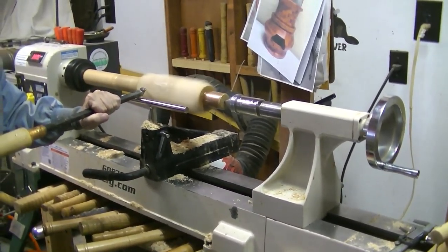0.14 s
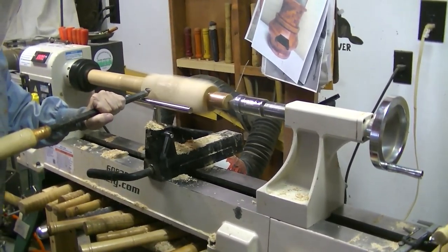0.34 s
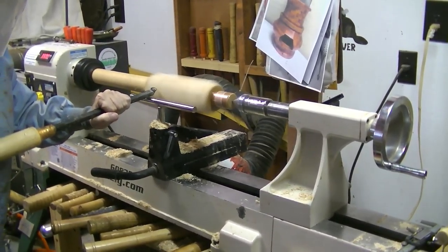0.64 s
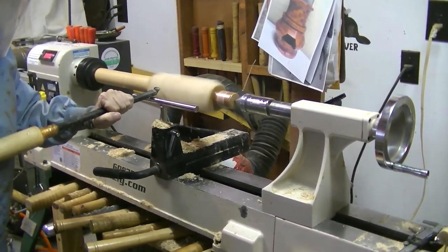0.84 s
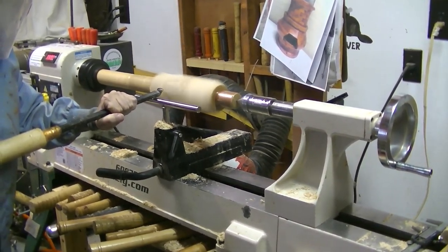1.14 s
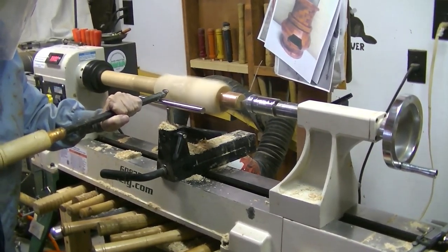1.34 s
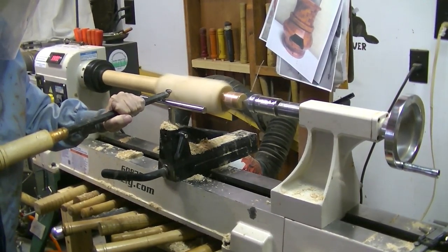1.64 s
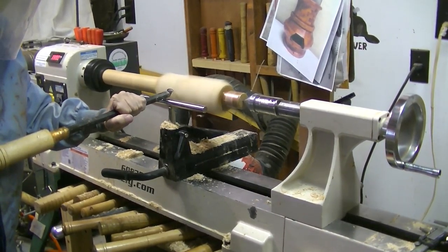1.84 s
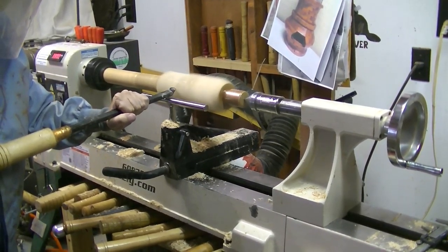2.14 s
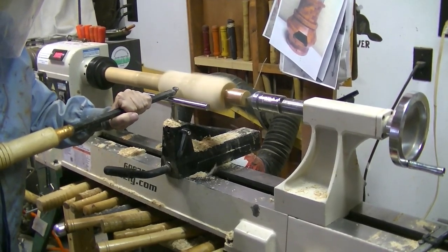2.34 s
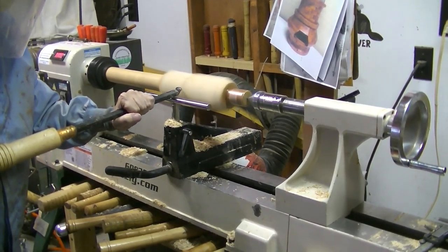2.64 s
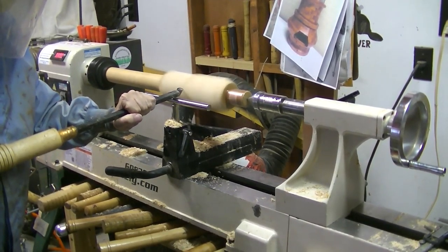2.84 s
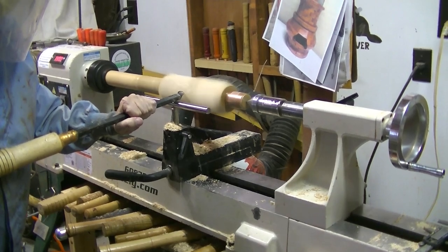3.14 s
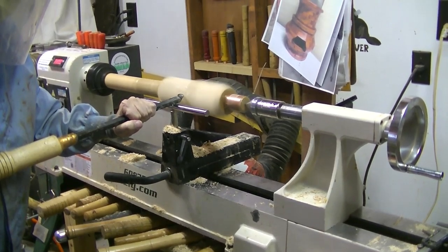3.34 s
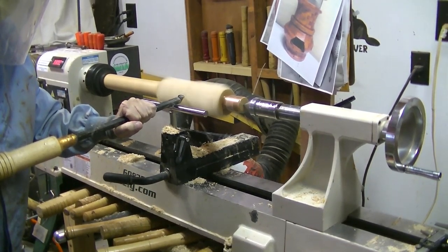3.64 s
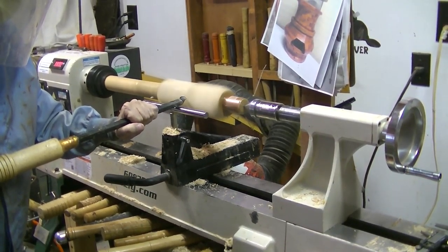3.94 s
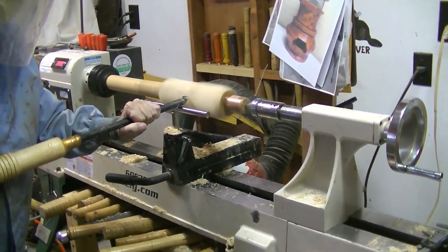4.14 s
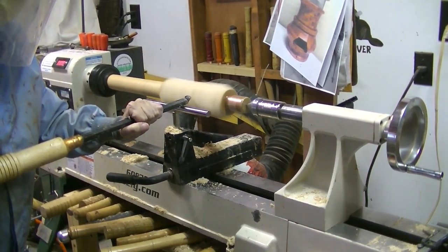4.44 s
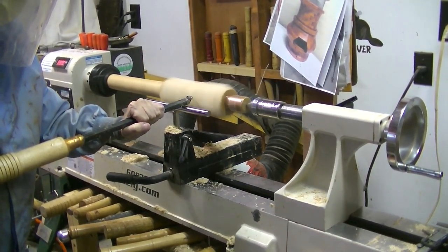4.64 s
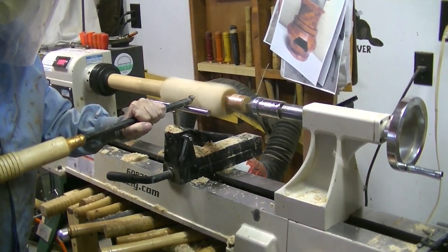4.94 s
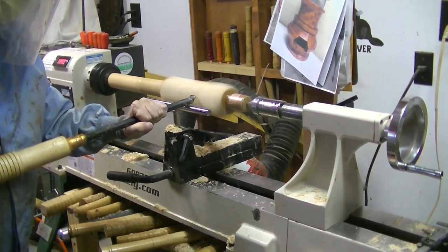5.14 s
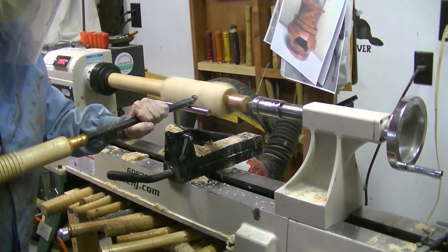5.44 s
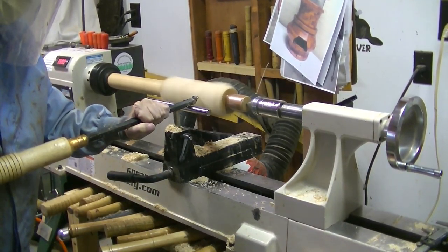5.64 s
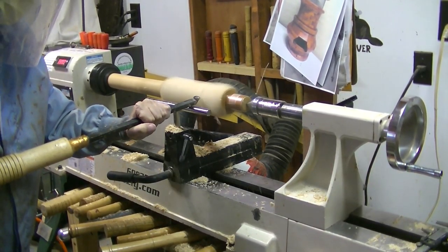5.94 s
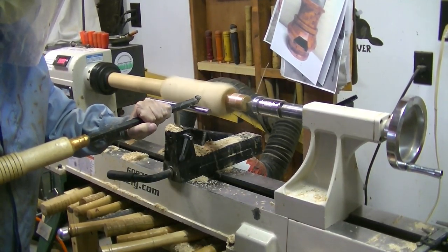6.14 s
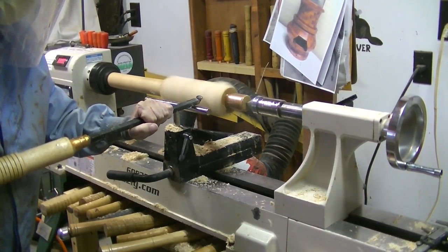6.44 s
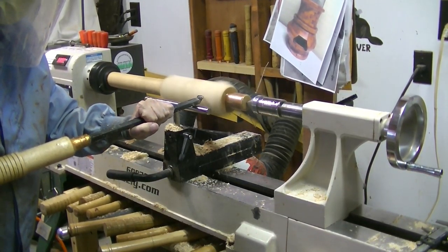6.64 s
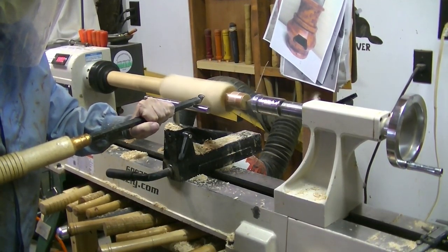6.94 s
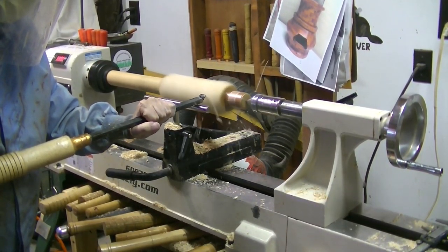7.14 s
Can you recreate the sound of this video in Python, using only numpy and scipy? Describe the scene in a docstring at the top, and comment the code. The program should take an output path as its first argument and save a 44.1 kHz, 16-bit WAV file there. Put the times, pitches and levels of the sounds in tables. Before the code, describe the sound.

A hand-held gouge scrapes and chatters along wood spinning on a lathe, with rapid ticking, sharp catches and hissing chips.

```python
"""A hand-held gouge travels along a not yet round wooden blank spinning on a lathe in a small workshop. Eight
ridges a turn tick on the edge, some catch hard, fibres tear in between; blank, gouge and rest ring. Chips hiss,
snap and ping on metal; the loudest catches give faint low thumps. Spindle and motor hum, the drive whines. A
sideways microphone pair faces the work with its right port."""
import sys
import numpy as np
from scipy import signal
from scipy.fft import rfft, irfft, next_fast_len
from scipy.io import wavfile
from scipy.ndimage import uniform_filter1d

SR = 44100
rng = np.random.default_rng(int(sys.argv[2]) if len(sys.argv) > 2 else 0)


def store_wav(level_fs):
    """Save 16-bit WAV to argv[1]."""
    pcm = np.round(np.clip(np.atleast_2d(level_fs), -1, 1) * 32767)
    wavfile.write(sys.argv[1], SR, pcm.T.astype(np.int16))


N = 320852

# hard catches of the edge: (time [s], bite [dB], wood thud [dB], chip snap [dB])
CATCHES = [(0.161, -18, -27, -35), (0.302, -6, -20, -33), (0.36, -5.5, -28, -28), (0.411, -6, -17, -27),
           (0.461, -9.5, -19, -38), (0.5102, -18, -13, -36), (0.6, -23, -35, -33), (0.6604, -9, -35, -33),
           (0.7, -15, -32, -30), (0.78, -12, -26, -33), (0.941, -1, -15, -36), (1.002, -2, -15, -34),
           (1.049, -0.5, -9, -21), (1.209, -6, -40, -10), (1.3613, -7, -19, -29), (1.498, -14, -37, -24),
           (1.54, -12, -22, -28), (1.699, -9, -10, -8), (1.7783, -6.5, -28, -17), (1.84, -10, -2, -33),
           (1.978, -7, -16, -11), (2.0187, -2.5, -25, -29), (2.059, -11, -38, -34), (2.0986, -16, -39, -34),
           (2.1776, -9, -28, -30), (2.218, -4.5, -13, -32), (2.342, -4.5, -5, -19), (2.458, -25, -11, -4.5),
           (2.592, -4.5, -3, -18), (2.6498, -11, -30, -32), (2.833, -13, -35, -12), (2.8802, -4, -21, -7),
           (2.9566, -14, -9, -9), (3.05, -10, -30, -28), (3.098, -9, -22, -28), (3.137, -7, -19, -30),
           (3.208, -2, -25, -32), (3.2864, -14, -32, -28), (3.4007, -5, -17, -11), (3.4483, -4.5, -17, -15),
           (3.5605, -7, -7, -19), (3.6162, -7, -24, -13), (3.777, -4, -31, -35), (3.8167, -4, -4, -39),
           (3.932, -6, -44, -28.5), (3.973, -8.5, -59, -24), (4.014, -3, -36, -11), (4.062, -3.5, -13, -29),
           (4.097, -7, -35, -26), (4.133, -3.5, -32, -11), (4.1724, -8, -40, -18), (4.258, -4.5, -12, -9),
           (4.2953, -6, -21, -17), (4.333, -17, -14, -1), (4.412, 0, -41, -14), (4.595, -18, -8, -29),
           (4.6356, -11, -9, -11), (4.7431, -22, -42, -31), (4.886, -9, -25, -30), (5.0076, -4, -14, -31),
           (5.056, -8, -6, -9), (5.147, -10, -33, -27), (5.199, -3, -33, -31), (5.3086, -4, -32, -14),
           (5.332, -6, -27, -31), (5.379, -7, -20, -33), (5.438, -3, -26, -29), (5.618, -7, -12, -36),
           (5.655, -19, -28, -40), (5.6987, -9, -5, -31), (5.8223, -4, -27, -7), (5.896, -0.5, -33, -10),
           (5.969, -17, -26, -33), (6.055, -4.5, -6, -27), (6.135, -9, -15, -9), (6.177, -0.5, -15, -23),
           (6.24, -1, -11, -30), (6.4553, -4.5, -13, -11), (6.6915, 0.5, -13, -19), (6.737, 0, -27, -28),
           (6.783, -4.5, -24, -20), (6.799, -3.5, -26, -14), (6.848, 2, -16, -15), (6.896, 1.5, -17, -6),
           (7.007, -6, -17, -33), (7.057, -3, -27, -31), (7.171, -7, -24, -32), (7.217, -10, -19, -33),
           (7.257, -17, -24, -33)]
# ring levels as the gouge travels: (time [s], blank [dB], gouge [dB], shank [dB], tip whistle [dB])
TRAVEL = [(0.0, -23.5, -26.5, -26, -39), (0.1, -28.5, -43, -38, -44), (0.36, -29, -31, -32, -36),
          (0.45, -26.5, -41, -32, -43), (0.61, -40, -28, -31, -30.5), (0.75, -28.5, -33, -29.5, -31),
          (0.83, -30, -31, -31, -46), (1.05, -31, -32, -31, -34), (1.13, -36, -31, -38, -39),
          (1.6, -36, -29, -31, -31.5), (1.76, -45, -33, -37, -43), (1.98, -44, -28, -32, -31),
          (2.78, -47, -31.5, -28.5, -43), (3.54, -38.5, -32, -27, -45), (3.95, -46, -28.5, -30.5, -34.5),
          (4.52, -42.5, -28.5, -35.5, -40), (5.37, -30, -26.5, -36, -41), (5.65, -28.5, -30.5, -38, -45),
          (5.69, -21, -25.5, -47, -40), (5.81, -32.5, -32, -32, -34), (6.1, -26, -31.5, -40, -46),
          (6.24, -28.5, -31, -40, -35), (6.34, -26, -38, -32, -42), (6.89, -28, -28, -39, -37),
          (6.97, -42, -33, -37, -45), (7.01, -29, -32, -29, -36), (7.21, -27, -43, -44, -45),
          (7.28, -29, -40, -40, -36)]


def cutting():
    """Tearing, ticks and catches excite wood and steel; rows: radiated to the right, to the left."""
    # edge pressure, as tearing: (time [s], level [dB])
    pressure = [(0.0, -24.5), (0.16, -22), (0.55, -25), (0.81, -23), (1.13, -24.5), (1.5, -20.5),
                (1.82, -24), (2.21, -22), (2.47, -22.5), (2.61, -27), (3.04, -21.5), (3.22, -21.5),
                (4.09, -22), (4.48, -23), (5.17, -22), (5.35, -24), (5.57, -23.5), (5.75, -21.5),
                (6.06, -22), (6.24, -22.5), (6.48, -22), (6.67, -21.5), (6.89, -22.5), (7.03, -25.5),
                (7.28, -24)]
    lift_db = lifts()
    tear_db = in_time(pressure)[0] + lift_db
    ticks = ridges(lift_db)
    noise = rng.standard_normal((4, 2, N))
    force = amp(tear_db + 0.5) * fibres(per_s=7000, uneven_db=4) + (ticks + catches()) * noise[0]
    power = force[0] ** 2
    strength = np.sqrt(uniform_filter1d(power, 12))
    grain = noise[1] * strength / np.sqrt(uniform_filter1d(power, SR // 4))  # texture without level
    rings = blank(grain, tear_db, noise[2]) + steel(grain, tear_db) + lathe_body(strength * noise[2])
    return scrape(force) + rings + chips(tear_db, ticks, noise[3]) + pings()


def fibres(per_s, uneven_db):
    """Fibres tear at random, in uneven sizes and clumps; two rows, rms 1."""
    sizes = amp(uneven_db * np.minimum(rng.exponential(1, N), 3.2)) * rng.choice([-1, 1], (2, N))
    tears = rng.random(N) < per_s / SR
    return rms_one(sizes * tears * amp(1.2 * drift(41)))


def ridges(lift_db):
    """Envelope, one tick per ridge; the blank's four old corners stand prouder than the flats."""
    # ridge height under the edge, as ticks: (time [s], level [dB])
    height = [(0, -33.5), (1.1, -33.5), (2.1, -32), (2.6, -29.5), (3.9, -35), (4.6, -39), (5.8, -31.5),
              (7.28, -36.5)]
    ridges_per_s, first_s = 200.19, 0.0009
    k = np.arange(int(N / SR * ridges_per_s))
    scatter_db = 3.6 * np.clip(rng.standard_normal(len(k)), -3, 1.5)
    proud_db = 3.4 * (k % 2 == 0) + 7.2 * (k % 8 == 4) + scatter_db
    ticks = bursts(first_s + k / ridges_per_s, proud_db + 6, t60_s=0.011)
    return amp(in_time(height)[0] + lift_db) * ticks


def catches():
    """Envelope of the edge catching: a sharp bite, then chatter."""
    s, bite_db, _, _ = np.transpose(CATCHES)
    return bursts(s, bite_db - 23, t60_s=0.0036) + bursts(s, bite_db - 13, t60_s=0.077)


def lifts():
    """The edge lets up briefly; dips in dB."""
    # (time [s], dip [dB])
    dips = [(0.127, -3.5), (0.497, -5), (0.557, -3.5), (1.181, -2.5), (1.815, -2.5), (2.004, -4),
            (2.42, -5.5), (2.5, -5.5), (3.256, -3), (3.35, -6), (4.386, -4.5), (4.82, -3), (5.109, -6),
            (5.42, -5.5), (5.944, -3.5), (6.363, -4), (6.441, -4), (6.605, -3.5), (7.156, -4.5),
            (7.204, -3.5)]
    half_width_s = 0.021
    t = np.arange(N) / SR
    return sum(db * np.exp(-((t - s) / half_width_s) ** 2) for s, db in dips)


def scrape(force):
    """Broad noise of the cut in five bands, each with its own swell and rasp."""
    # tearing spectrum: (frequency [Hz], level [dB])
    spectrum = [(150, -52.5), (300, -15), (480, -17.5), (700, -15), (1050, -6), (1400, -1.5), (2500, 2.5),
                (3500, 1), (4300, -5), (5500, -5.5), (6600, -33.5), (7200, -14), (11000, -28.5),
                (16000, -65)]
    # trends of bands 2 and 4: (time [s], low [dB], middle [dB])
    colour = [(0.0, -28, -27), (0.34, -30, -26), (3.08, -31, -27), (3.16, -25, -23), (3.34, -35, -30),
              (3.44, -28, -27), (4.72, -32, -24), (6.26, -29, -26), (6.32, -33, -30), (6.77, -27, -24),
              (7.28, -32, -32)]
    edges_hz, swell_db = (990, 1630, 2480, 4100), 1.5
    tearing = coloured(force, spectrum)
    below = [0] + [band(tearing, "low", hz) for hz in edges_hz] + [tearing]
    low_db, middle_db = (db - db.mean() for db in in_time(colour))
    trends_db = 0, low_db, 0, middle_db, 0
    return amp(8) * sum((upper - lower) * amp(db + swell_db * (drift(7.7) + drift(35)))
                        for lower, upper, db in zip(below, below[1:], trends_db))


def blank(grain, tear_db, noise):
    """The wood thuds under the cut, rings broadly and sings on a narrow gliding resonance."""
    # (frequency [Hz], width [Hz], level [dB])
    modes = [(940, 80, -4)]
    # (time [s], frequency [Hz])
    pitch = [(0, 955), (.45, 975), (1.7, 985), (4.9, 980), (6.0, 980), (6.3, 955), (7.28, 925)]
    level_db = in_time(TRAVEL)[0]
    s, _, thud_db, _ = np.transpose(CATCHES)
    thuds = (amp(tear_db - 7) + bursts(s, thud_db - 10, t60_s=0.29)) * noise
    ring = resonate(amp(level_db + 6) * grain, modes)
    singing = sing(amp(level_db + 2.5) * grain, in_time(pitch)[0], width_hz=15)
    return amp(7.5) * band(thuds, "band", [520, 1050]) + ring + singing


def steel(grain, tear_db):
    """Gouge and tool rest ring, swelling and fading with the travel; the overhanging tip whistles."""
    # resonances: (frequency [Hz], width [Hz], level [dB])
    rest = [(1995, 135, 8)]
    tang = [(2563, 77, 3)]
    edge = [(5064, 180, 3.3)]
    shank = [(4045, 55, 3), (3885, 100, 3)]
    tip = [(1710, 150, 8), (6478, 160, 5)]
    # (time [s], rest [dB], tang [dB], edge [dB])
    levels = [(0, -32.5, -31, -39), (.5, -35.5, -24, -40), (1.0, -32.5, -32, -33.5), (1.7, -33.5, -39, -36),
              (2.4, -36.5, -54, -34.5), (3.3, -32.5, -50, -38), (3.9, -28.5, -29.5, -32),
              (4.4, -28.5, -29, -30), (4.7, -35, -26, -39), (5.1, -32.5, -30, -28.5),
              (5.5, -33.5, -32, -39.5), (5.9, -29.5, -44, -33), (6.4, -31.5, -50, -32),
              (6.8, -32, -26, -36), (7.28, -35, -57, -31)]
    # (time [s], frequency [Hz])
    whistle_pitch = [(0, 4570), (.5, 4585), (1.65, 4575), (1.9, 4515), (2.7, 4380), (3.1, 4300),
                     (3.6, 4370), (4.2, 4480), (4.9, 4560), (5.9, 4600), (7.28, 4510)]
    # two gliding gouge rings: (time [s], lower [Hz], upper [Hz])
    gouge_pitch = [(0, 3065, 3180), (1.7, 3060, 3200), (2.0, 3050, 3235), (3.2, 3060, 3240),
                   (3.7, 3055, 3170), (6.2, 3065, 3165), (6.7, 3000, 3165), (7.28, 2990, 3165)]
    # upper ring re lower: (time [s], level [dB])
    balance = [(0, 6), (1.7, -10), (2.0, -3), (2.4, -10), (3.1, -3), (3.6, -6), (4.4, -3.5), (5.4, -1.5),
               (6.2, -2.5), (6.7, -5), (7.28, -9)]
    _, gouge_db, shank_db, whistle_db = in_time(TRAVEL)
    rest_db, tang_db, edge_db = in_time(levels)
    parts = [(rest_db, rest), (tang_db, tang), (edge_db, edge), (shank_db, shank), (tear_db - 14.5, tip)]
    rings = sum(resonate(amp(db - 1) * grain, modes) for db, modes in parts)
    tip_drive = amp(whistle_db + 3 + 0.6 * drift(8.3)) * grain
    whistle = sing(tip_drive, in_time(whistle_pitch)[0], width_hz=28)
    lower_hz, upper_hz = in_time(gouge_pitch)
    gouge_drive = amp(gouge_db + 4.5) * grain
    lower = sing(gouge_drive, lower_hz, width_hz=80)
    upper = sing(amp(in_time(balance)[0]) * gouge_drive, upper_hz, width_hz=34)
    return rings + whistle + lower - upper


def lathe_body(drive):
    """The lathe body resonates with the cut."""
    # (frequency [Hz], width [Hz], level [dB])
    modes = [(752, 28, -14.5), (662, 18.7, -14), (616.5, 22.5, -16.5), (1335, 27, -16.5),
             (1220, 220, -10.5), (1445, 230, -6.5), (2320, 52, -19.5), (1266, 29, -18), (3270, 20, -20),
             (6040, 300, -15.5), (9570, 810, -19.5)]
    return amp(1) * resonate(drive, modes)


def chips(tear_db, ticks, noise):
    """Chips spray in a gusting hiss, pulse with the ridges and snap at catches."""
    # (time [s], level [dB])
    spray_level = [(0, -15), (.9, -14), (1.2, -2), (2.3, 3.5), (3.2, 3), (4.2, 2), (5.5, 0), (6.6, -4),
                   (7.28, 0)]
    gust_db, snap_rise_hz = 4, 150
    hiss = amp(tear_db - 8.5 + gust_db * drift(14)) * fibres(per_s=4700, uneven_db=0.5)
    spray = amp(in_time(spray_level)[0]) * (hiss + amp(-5) * ticks * noise)
    s, _, _, snap_db = np.transpose(CATCHES)
    snaps = band(bursts(s, snap_db - 3.5, t60_s=0.062), "low", snap_rise_hz, order=1) * noise
    return band(band(spray + snaps, "high", 3900), "low", 4000, order=1)


def pings():
    """Hard chips hit metal; each rings a short high note and shatters in a spray."""
    # (time [s], level [dB], ring [Hz])
    hits = [(1.58, -21, 7950), (2.138, -12, 6360), (2.369, -16, 7700), (2.4593, -17, 7600),
            (2.8776, -23, 9100), (3.894, -11, 7350), (4.3314, -17, 6850), (5.8067, -20, 6670),
            (6.135, -21, 6940), (6.7347, -21, 7800), (6.8438, -32, 9670), (6.8937, -23, 7800)]
    rise_s, ring_t60_s, spray_t60_s = 0.00014, 0.0039, 0.033
    out, t = np.zeros(N), np.arange(SR // 50) / SR
    for s, db, hz in hits:
        tone = np.sin(2 * np.pi * hz * t) * np.minimum(t / rise_s, 1)
        spray = band(rng.standard_normal(len(t)), "band", [1.2 * hz, 1.24 * hz])
        i = int(s * SR)
        out[i:i + len(t)] += amp(db + 15.5 - 60 * t / ring_t60_s) * tone
        out[i:i + len(t)] += amp(db - 6 - 60 * t / spray_t60_s) * spray
    return out


def thumps():
    """The loudest catches give a faint low thump, one short dull push each; rows: left, right."""
    # (time [s], level [dB])
    pushes = [(0.779, -58), (1.048, -54), (1.21, -63), (4.012, -55), (5.199, -44), (5.332, -59),
              (5.436, -60), (5.697, -46), (5.896, -50), (6.179, -43), (6.691, -52), (6.848, -46),
              (6.897, -47)]
    half_width_s, delay_s, left_db = 0.0012, 0.003, -27
    t = np.arange(N) / SR
    push = sum(amp(db + 11.5) * np.exp(-((t - s - delay_s) / half_width_s) ** 2) for s, db in pushes)
    return push * amp([[left_db], [0]])


def machine():
    """Wavering hum of spindle and motor, thin two-tone whine of the drive."""
    # spindle orders and motor tones: (frequency [Hz], start level [dB], end level [dB])
    tones = [(276, -58, -51), (325, -54, -51), (348, -58, -57.5), (398, -69, -53), (430.4, -50, -43),
             (551, -40.5, -46.5), (596.5, -43, -39.5), (664, -37, -51), (764, -32, -43.5),
             (1377, -33.5, -66)]
    # (time [s], upper tone [dB], lower tone [dB])
    whine_levels = [(0, -46, -60), (3, -41, -49), (6.7, -66, -42), (7.28, -38, -58)]
    whine_hz = 9066.5, 8952.5
    t = np.arange(N) / SR
    hum = whine = 0
    for hz, start_db, end_db in tones:
        level_db = np.linspace(start_db, end_db, N) + 4.5 + 2.8 * drift(4.1)
        hum += amp(level_db) * np.sin(2 * np.pi * hz * t + drift(6.6))
    for hz, db in zip(whine_hz, in_time(whine_levels)):
        whine += amp(db + 3.5 + 2 * drift(26)) * np.sin(2 * np.pi * hz * t + 0.5 * drift(0.64))
    return hum + whine


def resonate(x, modes):
    """Parallel resonances with wavering levels and alternating signs."""
    out = 0
    for k, (hz, width_hz, db) in enumerate(modes):
        r = np.exp(-np.pi * width_hz / SR)
        gain = (-1) ** k * amp(db + 1.2 * drift(7)) * np.sqrt((1 - r * r) / 2)
        out += signal.lfilter([1, 0, -1], [1, -2 * r * np.cos(2 * np.pi * hz / SR), r * r], gain * x)
    return out


def sing(x, hz, width_hz):
    """Gliding resonance; unit rms gain for white noise."""
    turn, r = np.exp(2j * np.pi * np.cumsum(hz) / SR), np.exp(-np.pi * width_hz / SR)
    return np.sqrt(2 * (1 - r * r)) * (signal.lfilter([1], [1, -r], x / turn) * turn).real


def bursts(times_s, db, t60_s):
    """Envelope: instant rise at each time, exponential decay."""
    clicks = np.full(N, 1e-9)
    np.add.at(clicks, np.minimum((times_s * SR).astype(int), N - 1), amp(db))
    return signal.lfilter([1], [1, -amp(-60 / (t60_s * SR))], clicks)


def drift(rate_hz):
    """Slow random wander, spread about 1, extremes rounded off."""
    hop = 40
    r = np.exp(-2 * np.pi * rate_hz * hop / SR)
    slow = signal.lfilter([1], [1, -2 * r, r * r], rng.standard_normal(N // hop + 2002))[2000:]
    return np.interp(np.arange(N) / hop, np.arange(len(slow)), 1.8 * np.tanh(rms_one(slow) / 1.5))


def coloured(x, spectrum, size=4096):
    """Minimum-phase filter with the given spectrum."""
    cepstrum = irfft(at_hz(spectrum, size) * np.log(10) / 20, size)
    cepstrum[1:size // 2] *= 2
    cepstrum[size // 2 + 1:] = 0
    return signal.fftconvolve(x, irfft(np.exp(rfft(cepstrum)), size)[None], axes=1)[:, :N]


def band(x, kind, hz, order=2):
    return signal.sosfilt(signal.butter(order, hz, kind, fs=SR, output="sos"), x)


def in_time(rows):
    """One per-sample curve for each column after time."""
    s, *columns = np.transpose(rows)
    return [np.interp(np.arange(N) / SR, s, c) for c in columns]


def at_hz(points, size):
    """Table interpolated over log frequency at the FFT bins."""
    hz, value = np.transpose(points)
    return np.interp(np.log(np.arange(size // 2 + 1) * SR / size + 1), np.log(hz + 1), value)


def amp(db):
    return 10 ** (np.asarray(db) / 20)


def rms_one(x):
    return x / np.sqrt(np.mean(x ** 2) + 1e-20)


def scene():
    """The shadowed left port hears the right sound, late, plus other surfaces; both get room echoes."""
    # left port re right: (frequency [Hz], gain [dB])
    left_gain = [(100, 24), (200, -3), (340, -2), (520, -9.5), (760, -10), (960, -17.5), (1300, -15.5),
                 (2000, -14.5), (2600, -12), (4200, -10.5), (6400, -11.5), (8400, -15), (11000, -5.5),
                 (15000, -8)]
    # (frequency [Hz], left phase lead [rad])
    left_phase = [(60, -1), (350, -1.33), (860, -1.9), (1400, -2.1), (1900, -3.6), (2500, -4.55),
                  (3500, -4.55), (5000, -5.2), (9000, -4.9), (12000, -5.8), (16000, -6)]
    # (frequency [Hz], share of left power also heard on the right [0-1])
    coherence = [(170, .3), (350, .7), (700, .8), (1000, .55), (3000, .6), (5200, .55), (7000, .2),
                 (15000, .1)]
    room_db, room_t60_s = -11, 0.22
    size = next_fast_len(N + SR // 2)
    t = np.arange(SR // 2) / SR
    tails = rng.standard_normal((2, len(t))) * amp(-60 * t / room_t60_s) * (t > 0.003)
    echoes = rfft(tails / np.sqrt(np.sum(tails ** 2, axis=1, keepdims=True)), size) * amp(room_db)
    right, other = rfft(cutting(), size)
    steady, share = rfft(machine(), size), at_hz(coherence, size)
    left = np.sqrt(share) * right + np.sqrt(1 - share) * other + steady
    left *= amp(at_hz(left_gain, size)) * np.exp(1j * at_hz(left_phase, size))
    return irfft(np.array([left, right + steady]) * (1 + echoes), size)[:, :N]


def record(dry):
    """Peaks squashed, airborne bass cut, faint low thumps added at the loudest catches, top cut."""
    ceiling, bass_cut_hz, top_cut_hz = 0.74, 217, 16100
    squashed = dry / (1 + np.abs(dry / ceiling) ** 8) ** (1 / 8)
    mix = band(squashed, "high", bass_cut_hz, order=6) + thumps()
    return np.clip(signal.sosfilt(signal.cheby2(16, 70, top_cut_hz, fs=SR, output="sos"), mix), -1, 1)


dry = scene()
out = record(dry)
store_wav(out)
```